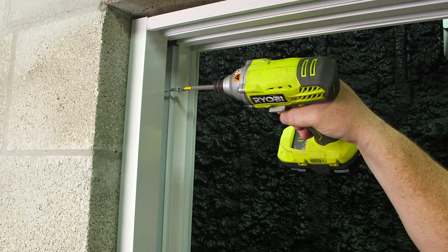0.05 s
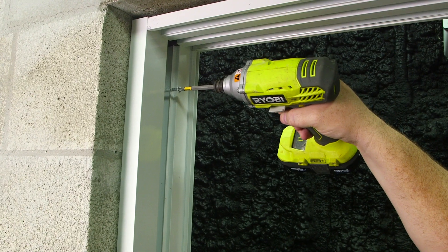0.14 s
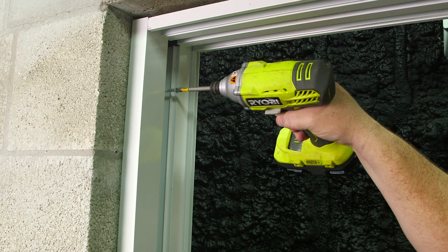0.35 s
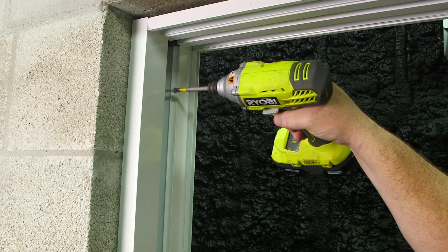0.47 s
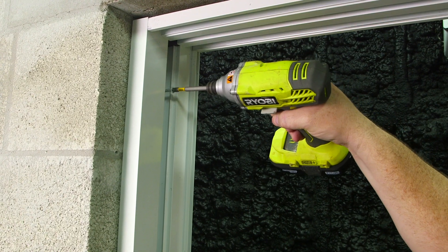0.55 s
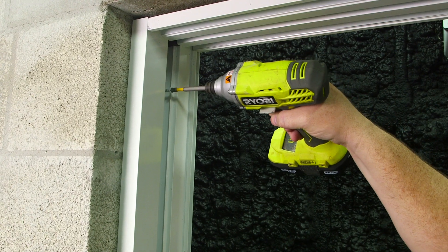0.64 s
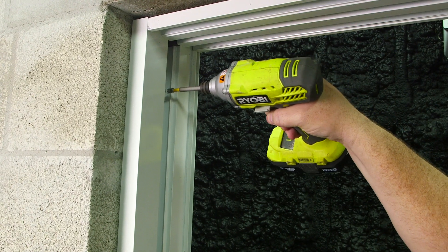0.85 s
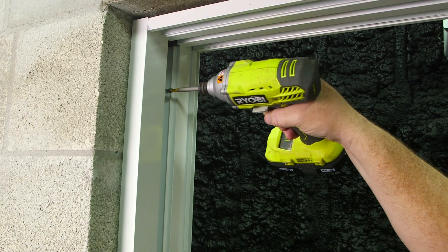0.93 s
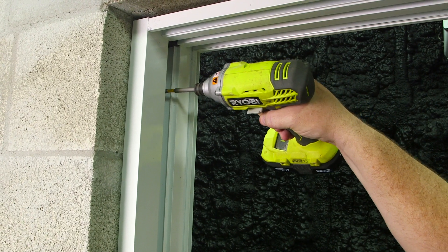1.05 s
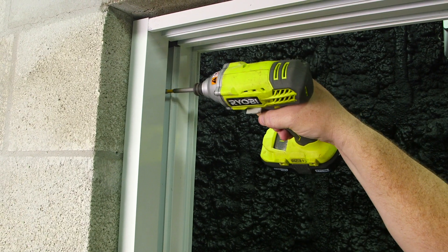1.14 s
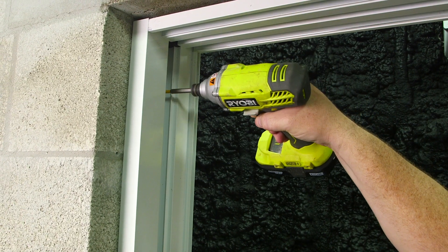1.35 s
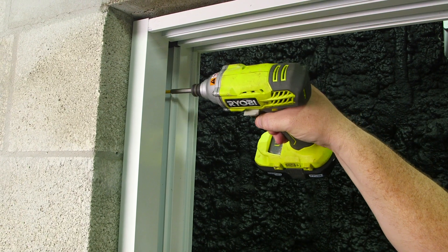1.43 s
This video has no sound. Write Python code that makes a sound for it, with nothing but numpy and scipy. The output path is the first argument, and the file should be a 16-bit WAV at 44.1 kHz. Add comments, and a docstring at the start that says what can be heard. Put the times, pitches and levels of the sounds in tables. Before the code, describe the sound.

A cordless impact driver grinds a screw through a metal door frame into concrete, then thuds to a stop

```python
"""Impact driver in a doorway

A cordless impact driver runs an anchor screw through a metal door frame into concrete block in one short burst.
Over low rumble and faint air noise, noise-burst clacks of trigger, bit and hammer come before, during and after
the drive. Filtered random grains make the thread's grind, gear rattle and hiss; the grind also rings the frame
modes. Gliding rough tones squeal over the motor's sine whine. Clicks through modes make the stop thud, with noise
rattle and a low boom; noise tails add the doorway's short echo."""
import sys
import numpy as np
from scipy import signal
from scipy.fft import rfft, irfft
from scipy.io import wavfile

SR = 44100
rng = np.random.default_rng(int(sys.argv[2]) if len(sys.argv) > 2 else 0)


def transcribe(signal):
    """Save signal, clipped to [-1, 1], as a 16-bit WAV file at the path in sys.argv[1]."""
    frames = np.atleast_2d(signal).T
    limited = np.clip(frames, -1, 1)
    pcm = np.round(limited * 32767).astype(np.int16)
    wavfile.write(sys.argv[1], SR, pcm)


N = 66150
T = np.arange(N) / SR
START_S, STOP_S, SPIN_UP_S, SPIN_DOWN_S = 0.208, 1.285, 0.0018, 0.022
MOTOR_HZ = 345.4  # turns per second

# spectrum of hiss and clack cracks: (frequency [Hz], relative level [dB])
HISS_COLOUR = [(1000, -6), (2800, -0.5), (4100, 8), (5200, 6), (7200, 1.5), (8500, 0), (10500, 0),
               (12400, 6), (13600, 2), (15000, -3), (16000, -5)]


def from_db(db):
    """Decibels to gain."""
    return 10 ** (np.asarray(db) / 20)


def rms_one(x):
    """Scale to unit rms."""
    return x / np.sqrt(np.mean(x ** 2) + 1e-20)


def in_time(rows):
    """Each column of a curve at every sample."""
    s, *columns = np.transpose(rows)
    return [np.interp(T, s, c) for c in columns]


def colour(x, points):
    """Causal minimum-phase filter with the given spectrum shape and unit power gain."""
    size = 8192
    hz, db = np.transpose(points)
    grid_hz = np.maximum(np.arange(size // 2 + 1) * SR / size, 1)
    gain = from_db(np.interp(np.log(grid_hz), np.log(hz), db))
    cepstrum = irfft(np.log(gain))
    # keeping only the causal half of the cepstrum makes the phase minimal
    response = irfft(np.exp(rfft(2 * cepstrum[:size // 2], size)))
    return signal.fftconvolve(x, response / np.linalg.norm(response))[:N]


def high_pass(x, order, hz):
    """Butterworth low cut."""
    return signal.sosfilt(signal.butter(order, hz, "high", fs=SR, output="sos"), x)


def drift(rate_hz):
    """Smooth chance with spread 1."""
    r = np.exp(-2 * np.pi * rate_hz / SR)
    white = rng.standard_normal(2 * N)
    return rms_one(signal.lfilter([1], [1, -2 * r, r * r], white)[N:])  # first half settles the filter


def ring(x, modes):
    """A unit click sets each mode ringing at its level."""
    out = 0
    for hz, db, t60_s in modes:
        r = np.exp(-np.log(1000) / (t60_s * SR))
        w = 2 * np.pi * hz / SR
        mode = signal.lfilter([0, np.sin(w)], [1, -2 * r * np.cos(w), r * r], x + 1e-18)
        out = out + from_db(db) * mode
    return out


def grains(per_s, spread_db, turn_hz, throb_db):
    """Random tiny fractures and contacts, stronger once in each turn; unit rms."""
    turn = np.cumsum(turn_hz * (1 + 0.013 * drift(7.5))) / SR
    random_db = spread_db * np.minimum(rng.exponential(1, N), 4)
    sizes = from_db(random_db + throb_db * np.cos(2 * np.pi * turn))
    hits = rng.random(N) < per_s / SR
    return rms_one(sizes * rng.choice([-1, 1], N) * hits)


def burst(s, decay_s):
    """Sudden onset, exponential decay."""
    return (T >= s) * np.exp(-np.maximum(T - s, 0) / decay_s)


def gate(s, end_s, attack_s, release_s):
    """Linear attack, hold, exponential release."""
    return np.clip((T - s) / attack_s, 0, 1) * np.exp(-np.maximum(T - end_s, 0) / release_s)


def background():
    """Low rumble and faint air noise of the building: two coloured noises with slow levels."""
    # (time [s], level [dB])
    rumble_level = [(0, -53), (.08, -48.5), (.12, -58), (.17, -46), (.27, -46), (.5, -46.5), (.9, -44),
                    (1.27, -49.5), (1.32, -42), (1.42, -42), (1.5, -46.5)]
    # (frequency [Hz], relative level [dB])
    rumble_colour = [(25, -33), (55, -17), (72, -14), (90, 10), (125, 6.5), (170, -1.5), (260, -19),
                     (600, -65.5)]
    # (time [s], level [dB])
    air_level = [(.15, -52.5), (1.35, -56)]
    # (frequency [Hz], relative level [dB])
    air_colour = [(100, -21), (200, 1), (380, -5.5), (600, -9.5), (1200, -16), (2500, -21), (9000, -21),
                  (15000, -19.5)]
    rumble = from_db(in_time(rumble_level)[0]) * rms_one(colour(rng.standard_normal(N), rumble_colour))
    air = from_db(in_time(air_level)[0]) * colour(rng.standard_normal(N), air_colour)
    return rumble + air


def high_whistle():
    """A very faint steady sine near the top of hearing."""
    whistle_hz, whistle_db = 15680, -71
    return from_db(whistle_db) * np.sin(2 * np.pi * whistle_hz * T)


def clacks():
    """Each metal contact is a bright crack on a duller body, both decaying noise."""
    # contacts of trigger, bit and hammer: (time [s], body level [dB], crack level [dB])
    contacts = [(0.149, -58, -54), (0.17, -42, -48), (0.188, -35, -33.5), (0.2076, -28.5, -16.5),
                (0.348, -24.5, -21.5), (0.465, -31, -18.5), (.492, -55, -14), (0.975, -54, -32),
                (1.0928, -33, -20.5), (1.28, -24.5, -50), (1.437, -34, -41), (1.453, -42, -40),
                (1.490, -33, -43.5)]
    # (frequency [Hz], relative level [dB])
    body_colour = [(150, -39), (320, -4), (480, 4.5), (800, 0.5), (1200, 7.5), (1550, -4), (2050, 1.5),
                   (2700, -24), (8000, -51)]
    body_decay_s, crack_decay_s = 0.0059, 0.0031
    body = sum(from_db(db) * burst(s, body_decay_s) for s, db, _ in contacts)
    crack = sum(from_db(db) * burst(s, crack_decay_s) for s, _, db in contacts)
    dull = colour(body * rng.standard_normal(N), body_colour)
    bright = colour(crack * rng.standard_normal(N), HISS_COLOUR)
    return dull + bright


def motor():
    """A thin wavering whine with its octave, and the low shake of the running tool in the frame."""
    # (time [s], pitch [Hz], level [dB], octave level [dB])
    whine_track = [(.163, 6800, -69, -55), (.175, 6760, -75, -42), (.18, 6500, -48, -51),
                   (.21, 6260, -47, -55), (.5, 6320, -50, -57), (.93, 6350, -42, -55),
                   (1.15, 6300, -42, -37), (1.2, 6510, -44, -48), (1.265, 6530, -44, -46),
                   (1.285, 6450, -63, -63)]
    waver_share = 0.00196
    shake_hz, shake_db = 136.5, -46
    hz, db, octave_db = in_time(whine_track)
    phase = 2 * np.pi * np.cumsum(hz * (1 + waver_share * drift(71))) / SR
    whine = from_db(db) * np.sin(phase) + from_db(octave_db) * np.sin(2 * phase)
    whine = whine * (T > whine_track[0][0]) * (T < whine_track[-1][0])
    shake = np.sin(2 * np.pi * np.cumsum(shake_hz * (1 + 0.042 * drift(17.6))) / SR)
    return whine + from_db(shake_db) * shake * gate(START_S, STOP_S, 0.032, SPIN_DOWN_S)


def grinding(crush, level_db):
    """The thread crushes concrete: random fractures, coloured."""
    # (frequency [Hz], relative level [dB])
    grind_colour = [(100, -46), (230, -30.5), (320, -5), (390, -21), (480, 8.5), (560, 10), (700, 9.5),
                    (900, 8.5), (1100, -4), (2000, -10.5), (4000, -30.5)]
    grind_trim_db = -1.5
    return from_db(grind_trim_db) * colour(crush * from_db(level_db), grind_colour)


def frame_ring(crush, running):
    """Crushing and the first catch of the bit excite the door frame's modes."""
    # door frame: (frequency [Hz], level [dB], t60 [s])
    frame_modes = [(484.8, 5, 0.17), (494.6, 8, 0.22), (619.5, -0.5, 0.18), (746, -5, 0.19),
                   (829, -10.5, 0.23), (934, -12, 0.088), (1121, -4, 0.17), (1229, -1, 0.086),
                   (1469, -0.5, 0.1), (2057, -4.5, 0.18)]
    # drive of the ring; it dies as the screw head clamps the frame: (time [s], level [dB])
    ring_drive = [(.21, -26.5), (.235, -29), (.25, -37.5), (.42, -37.5), (.46, -29), (.55, -29.5),
                  (.64, -27.5), (.71, -31), (.755, -22), (.775, -57), (.79, -19), (.84, -31), (.91, -38.5),
                  (.97, -51)]
    ring_trim_db, catch_db = -1, -34.5
    low_cut_hz = 410  # the frame's ring carries nothing below its lowest modes
    force = crush * running * from_db(in_time(ring_drive)[0])
    frame = from_db(ring_trim_db) * ring(force, frame_modes) / np.std(ring(crush, frame_modes))
    catch = from_db(catch_db) * ring(signal.unit_impulse(N, int(START_S * SR)), frame_modes)
    return high_pass(frame + catch, 3, low_cut_hz)


def gear_rattle(running, level_db):
    """Random gear contacts throb with each motor turn."""
    # (frequency [Hz], relative level [dB])
    gear_colour = [(200, -25.5), (330, -11), (400, -17), (520, -16.5), (750, -10), (1100, 5), (1500, 4),
                   (2050, -2.5), (2400, -9.5), (3200, -19), (8000, -15.5)]
    gear_trim_db, spread_db, throb_db = -3, 3.5, -1
    contacts = grains(3000, spread_db, MOTOR_HZ, throb_db)
    return colour(contacts * running * from_db(level_db + gear_trim_db), gear_colour)


def grit_and_fan_hiss(running):
    """Dense grains, throbbing with each motor turn, make the hiss of fan and scraping grit."""
    # (time [s], level [dB])
    hiss_level = [(.21, -29), (.245, -41), (.35, -29.5), (.44, -32), (.5, -24.5), (.56, -32.5),
                  (.61, -34.5), (.75, -34.5), (.83, -33), (.95, -36.5), (1.06, -32), (1.08, -39),
                  (1.11, -36), (1.18, -34), (1.2, -46), (1.26, -39.5), (1.29, -64)]
    spread_db, throb_db = 3, 4
    scrapes = grains(9000, spread_db, MOTOR_HZ, throb_db)
    return colour(scrapes * running * from_db(in_time(hiss_level)[0]), HISS_COLOUR)


def driving():
    """One load drives grind and gears, one crushing force grind and frame; returns scrape and frame."""
    # before trims: (time [s], grind level [dB], gear rattle level [dB])
    load = [(.21, -30, -18), (.235, -36, -33), (.28, -28.5, -25.5), (.32, -40, -36.5), (.35, -34.5, -28),
            (.40, -33, -30.5), (.49, -39.5, -37.5), (.53, -32, -33.5), (.63, -32.5, -30.5),
            (.73, -26.5, -28), (.762, -35, -21), (.770, -55, -68), (.781, -55, -56), (.792, -29.5, -24.5),
            (.825, -32, -26.5), (.85, -30, -23.5), (.915, -27.5, -32.5), (.98, -38, -31.5),
            (1.07, -48, -35), (1.11, -41, -29.5), (1.14, -47.5, -36.5), (1.25, -51, -31.5),
            (1.29, -32.5, -33.5)]
    spindle_hz, grains_per_s, spread_db, throb_db = 43.9, 2500, 3, 3
    clump_db, clump_hz = 2, 44.2  # the thread meets hard and soft grains of the block
    grind_db, gear_db = in_time(load)
    running = gate(START_S, STOP_S, SPIN_UP_S, SPIN_DOWN_S)
    crush = grains(grains_per_s, spread_db, spindle_hz, throb_db)
    clumps_db = clump_db * drift(clump_hz)
    grind = grinding(crush * running, grind_db + clumps_db)
    gears = gear_rattle(running, gear_db + clumps_db)
    scrape = grind + gears + grit_and_fan_hiss(running)
    return scrape, frame_ring(crush, running)


def squeals():
    """Thread stick-slip: rough gliding tones with their octave, which also ring screw and bit."""
    # the thread sticks and slips in the hole: (time [s], length [s], start pitch [Hz], end pitch [Hz],
    # level before trim [dB], octave re fundamental [dB], pitch roughness [share])
    slip_events = [(0.257, 0.015, 4770, 4720, -23, -6.5, 0.044),
                   (0.283, 0.0082, 6250, 7060, -28.5, 12, 0.024),
                   (0.296, 0.01, 7750, 8890, -20.5, -23, .02), (0.306, .027, 6146, 6500, -35, 17, 0.022),
                   (0.345, 0.021, 2253, 2534, -21.5, -8.5, 0.083),
                   (0.364, 0.011, 5910, 5400, -26.5, -3, .04),
                   (0.383, 0.0069, 5680, 5410, -23.5, -4, 0.0293),
                   (0.389, 0.027, 4810, 5144, -25, -18, 0.1), (0.417, .016, 5810, 5620, -28.5, -1.5, .07),
                   (0.427, 0.019, 5425, 4664, -24.5, -19, 0.057),
                   (.465, 0.027, 4940, 4450, -23.5, -11, 0.16),
                   (0.496, 0.024, 4710, 4725, -21.5, -14, 0.057),
                   (0.532, 0.021, 4830, 5120, -28.5, -29, 0.091), (0.576, 0.026, 2262, 2413, -33, -4, 0.07),
                   (0.648, 0.019, 5200, 6004, -22, -9.5, 0.06), (0.693, 0.026, 6840, 5580, -27, -29, 0.058),
                   (0.768, 0.0057, 7810, 5320, -24, -4, .04), (0.771, 0.018, 5700, 5370, -25.5, -4, .03),
                   (0.782, 0.023, 5237, 5080, -24, -14, 0.054), (0.897, 0.034, 745, 784, -35.5, 0, 0.099),
                   (0.921, 0.01, 4257, 4403, -29, -5.5, 0.1), (0.973, 0.0015, 3380, 3320, -33, -1, 0.044),
                   (1.167, .014, 4110, 4050, -40.5, -4, 0.07),
                   (1.191, 0.028, 2600, 2610, -40.5, -16, 0.012)]
    # screw and bit: (frequency [Hz], level [dB], t60 [s])
    steel_modes = [(2210, -6, 0.09), (2617, -2, 0.12), (4410, 11.5, 0.084), (4590, 11, 0.045),
                   (4740, 3, 0.15), (4890, 3.5, 0.12), (5236, -2, 0.06), (5370, 11.5, 0.084),
                   (5810, -1, 0.11), (12100, 10, 0.044), (12400, 19, 0.042)]
    attack_s, release_s, settle_s = 0.00042, 0.0064, 0.0089
    trim_db, steel_db, jitter_hz = -1, -33.5, 512.3
    flutter_db, flutter_hz, swell_max = 4.5, 464, 0.7  # the grip flutters; a slip swells only so far (spreads)
    rasp, rasp_hz = 6.1, 900  # uneven slip strength per unit of pitch roughness
    out = np.zeros(N)
    for s, length_s, start_hz, end_hz, db, octave_db, rough in slip_events:
        glide_hz = end_hz + (start_hz - end_hz) * np.exp(-np.maximum(T - s, 0) / settle_s)
        hz = glide_hz * (1 + rough * drift(jitter_hz))
        phase = 2 * np.pi * np.cumsum(hz) / SR
        grip_db = flutter_db * np.minimum(drift(flutter_hz), swell_max)
        level = gate(s, s + length_s, attack_s, release_s) * from_db(db + trim_db + grip_db)
        slips = rms_one(np.tanh(1 + rasp * rough * drift(rasp_hz)))
        tone = np.sin(phase) + from_db(octave_db) * np.sin(2 * phase)
        out += np.sqrt(2) * level * slips * tone
    return out + from_db(steel_db) * rms_one(ring(out, steel_modes))


def stop_thud():
    """The sudden stop knocks tool and frame, loose parts rattle and a low boom dies away."""
    # the stop kicks the tool against the frame: (time [s], level [dB])
    kicks = [(1.2996, -7), (1.3022, 1), (1.3081, -25)]
    # (frequency [Hz], level [dB], t60 [s])
    thud_modes = [(317, -26.5, 0.012), (513, -14, 0.018), (569, -25, 0.24), (740, -19, 0.034),
                  (1181, -28.5, 0.1), (1509, -28.5, 0.19), (3700, -33, 0.076)]
    # (frequency [Hz], relative level [dB])
    rattle_colour = [(60, -21), (150, -5.5), (400, 3.5), (1600, -0.5), (2600, -19.5), (3600, -11.5),
                     (5000, -15.5), (7000, -26.5), (16000, -31)]
    # (frequency [Hz], relative level [dB])
    after_colour = [(70, -45), (125, 8), (215, 10), (300, -8), (600, -47)]
    contact_hz, rattle_db, rattle_s = 3040, -21, 0.021
    boom_s, boom_end_s, boom_hz, boom_db = 1.306, 1.334, 139, -25.5
    after_db, after_s = -36.5, 0.11
    clicks = np.zeros(N)
    for s, db in kicks:
        clicks[int(s * SR)] += from_db(db)
    soft = signal.sosfilt(signal.butter(1, contact_hz, fs=SR, output="sos"), clicks)
    knock = high_pass(ring(soft, thud_modes), 2, 200)
    rattle = colour(burst(kicks[0][0], rattle_s) * rng.standard_normal(N), rattle_colour)
    boom = gate(boom_s, boom_end_s, 0.0051, 0.02) * np.sin(2 * np.pi * boom_hz * (T - boom_s))
    after = colour(burst(boom_s, after_s) * rng.standard_normal(N), after_colour)
    return knock + from_db(rattle_db) * rattle + from_db(boom_db) * boom + from_db(after_db) * after


def doorway(x):
    """Close reflections from frame and block, then a short tail whose treble dies sooner."""
    early_db, early_s = -5, 0.0048
    early_low_cut_hz = 1840  # early reflections carry only the treble
    tail_db, delay_s, low_t60_s, treble_t60_s, split_hz = -9, 0.006, 0.32, 0.2, 4600
    early = high_pass(burst(0.0012, early_s) * rng.standard_normal(N), 2, early_low_cut_hz)
    white = rng.standard_normal(N)
    low = signal.sosfiltfilt(signal.butter(2, split_hz, fs=SR, output="sos"), white)
    low_tail = low * burst(delay_s, low_t60_s / np.log(1000))
    treble_tail = (white - low) * burst(delay_s, treble_t60_s / np.log(1000))
    tail = low_tail + treble_tail
    response = from_db(early_db) * early / np.linalg.norm(early) + from_db(tail_db) * tail / np.linalg.norm(tail)
    response[0] = 1  # direct sound
    return signal.fftconvolve(x, response / np.linalg.norm(response))[:N]


def scene():
    """The tool in the doorway, with frame, motor, background and whistle added without the echo."""
    scrape, frame = driving()
    echoed = doorway(scrape + squeals() + clacks() + stop_thud())
    return (echoed + frame + motor() + background() + high_whistle())[None]


def record(dry):
    """The microphone drops the deep bass; the top is cut steeply."""
    low_cut_hz, cutoff_hz = 57, 16000
    thin = high_pass(dry, 3, low_cut_hz)
    return signal.sosfilt(signal.ellip(10, 0.1, 80, cutoff_hz, fs=SR, output="sos"), thin)


dry = scene()
out = record(dry)
transcribe(out)
```